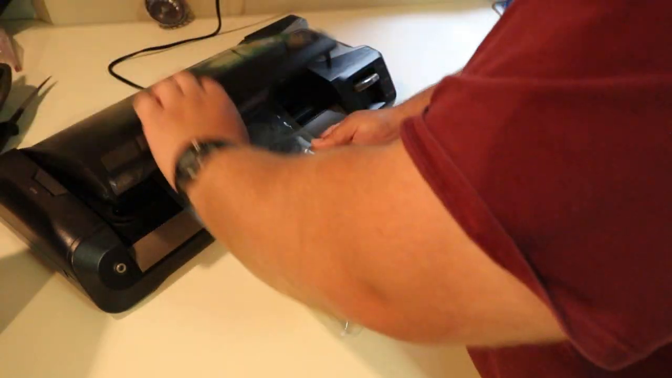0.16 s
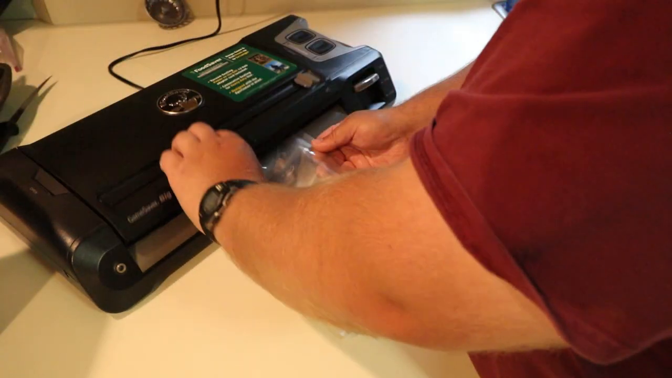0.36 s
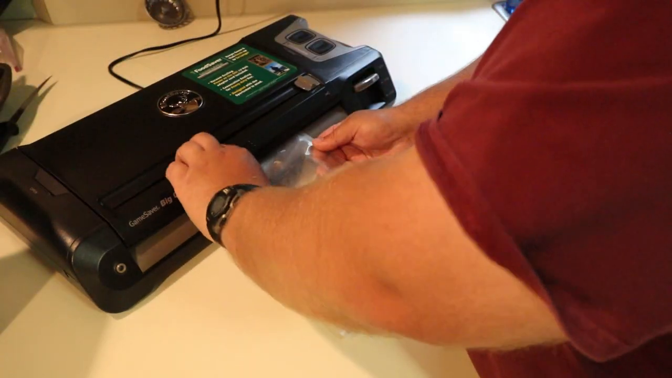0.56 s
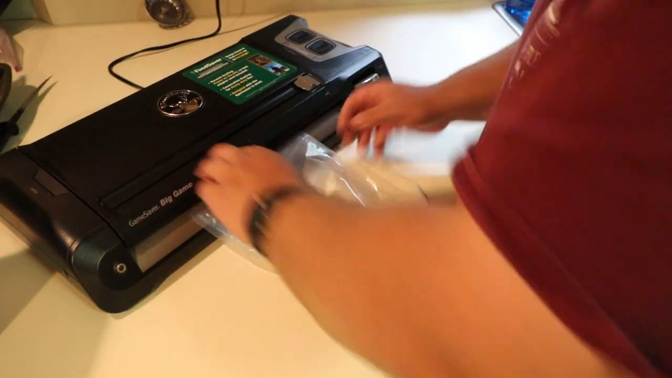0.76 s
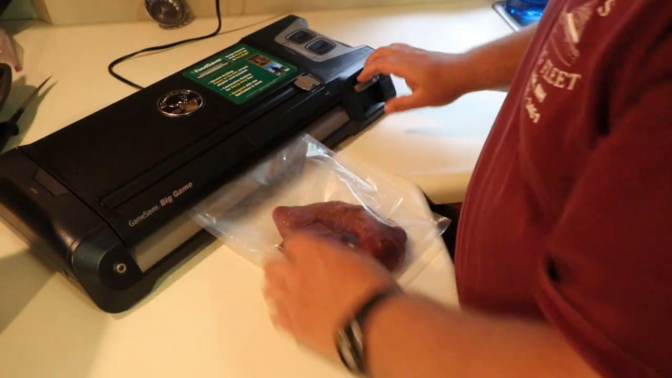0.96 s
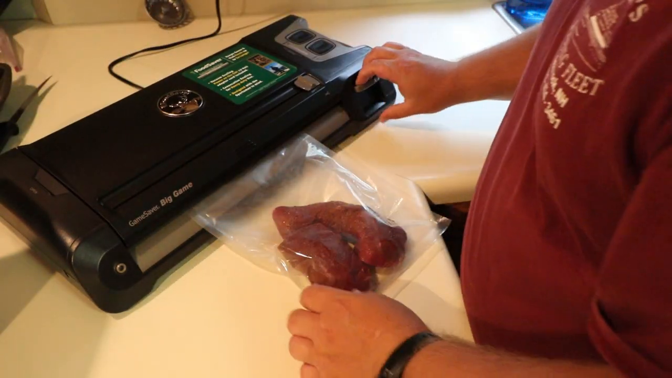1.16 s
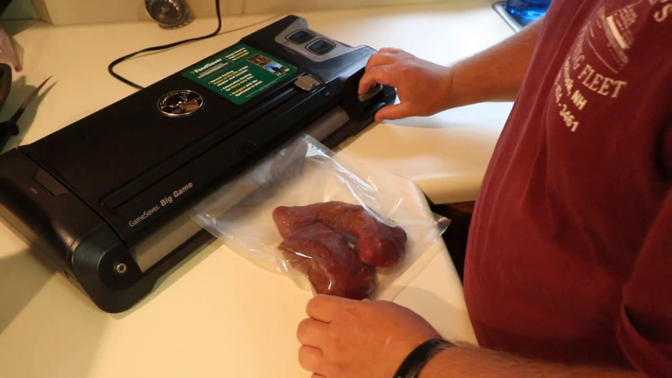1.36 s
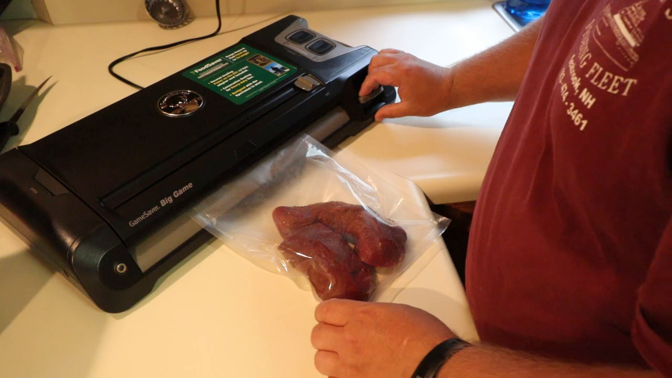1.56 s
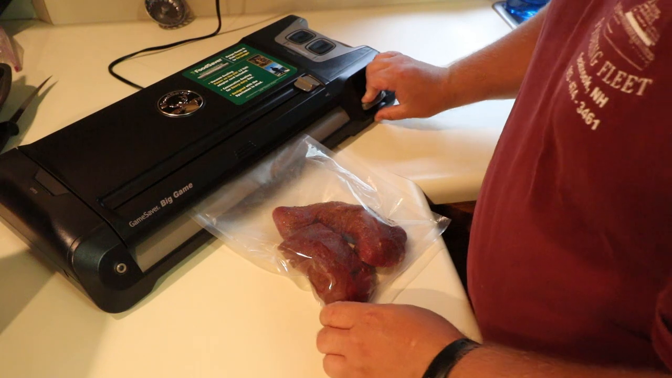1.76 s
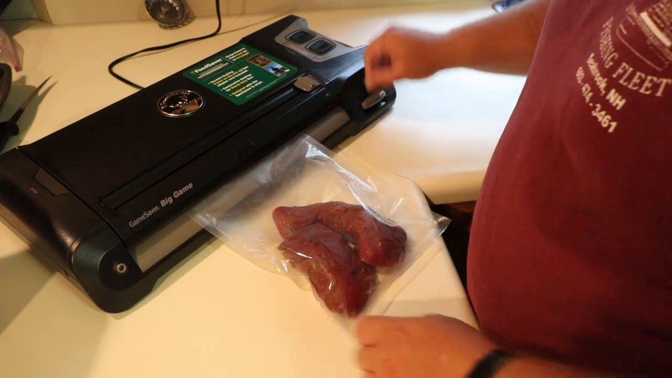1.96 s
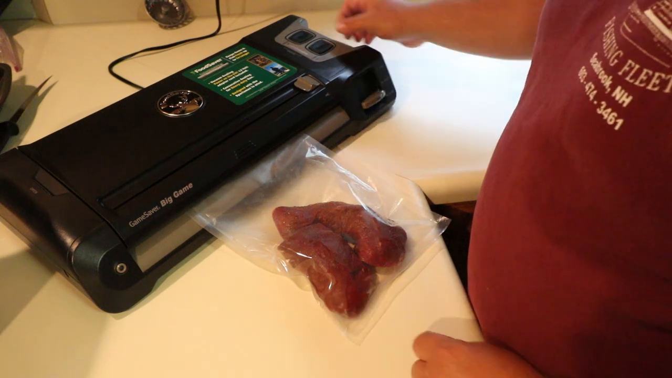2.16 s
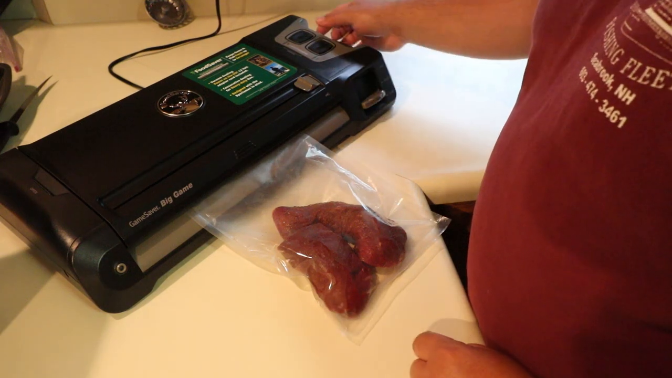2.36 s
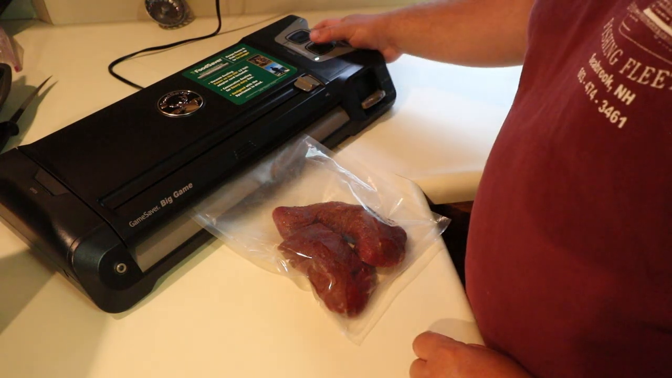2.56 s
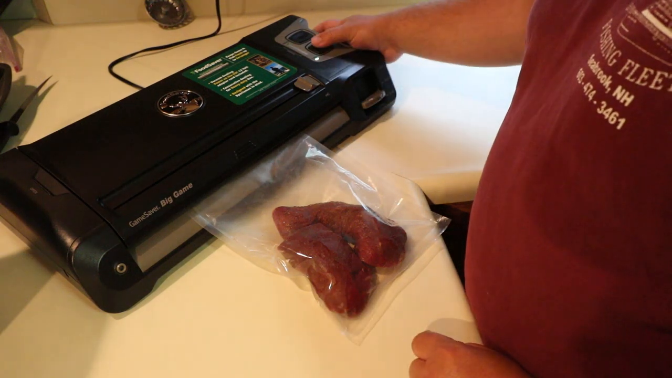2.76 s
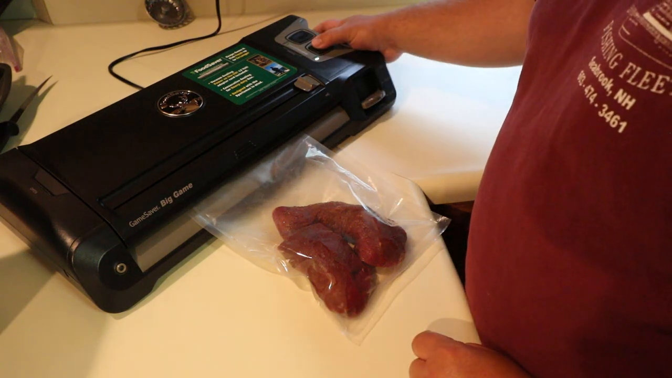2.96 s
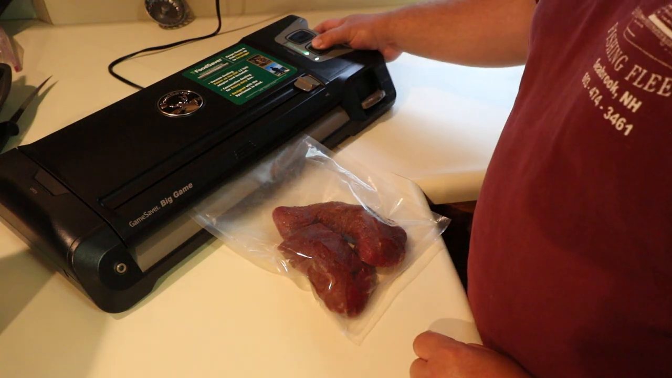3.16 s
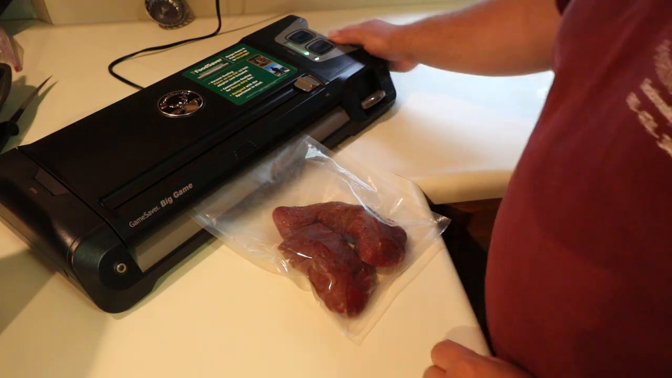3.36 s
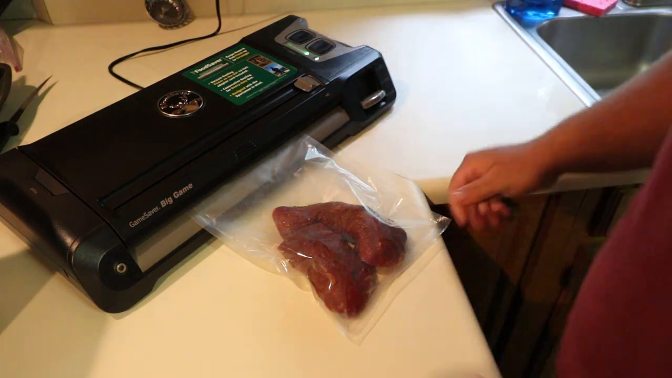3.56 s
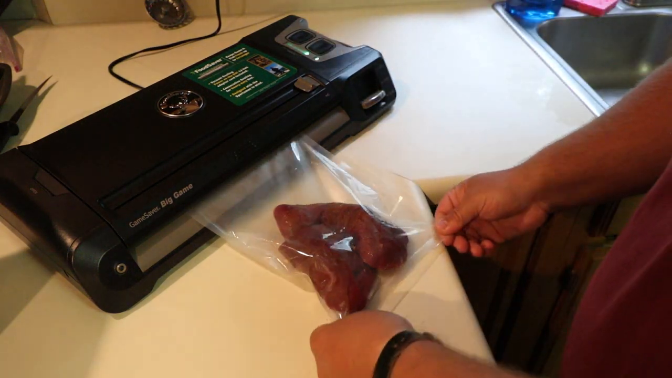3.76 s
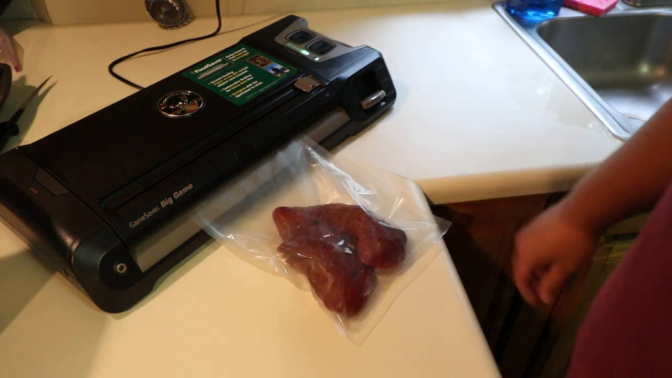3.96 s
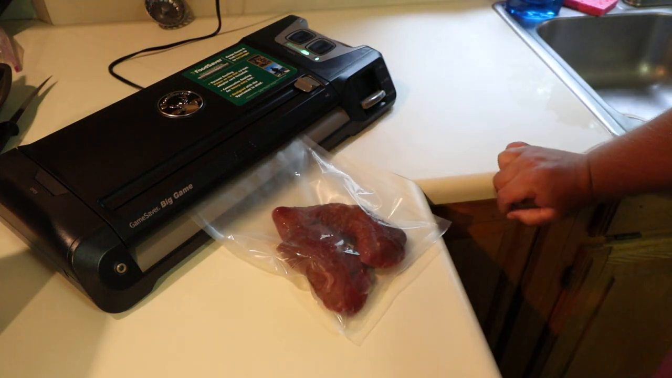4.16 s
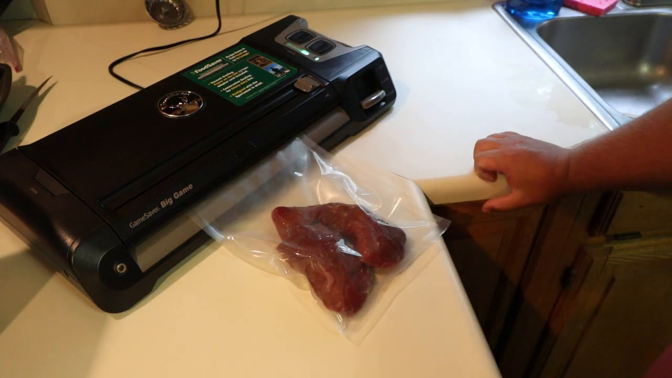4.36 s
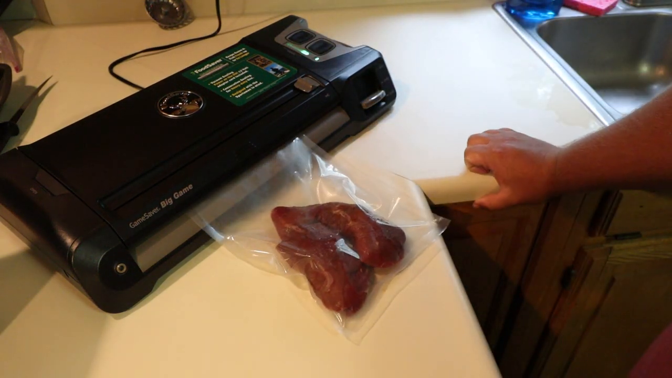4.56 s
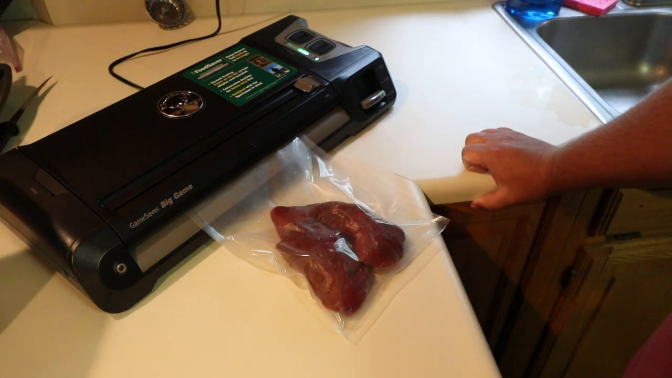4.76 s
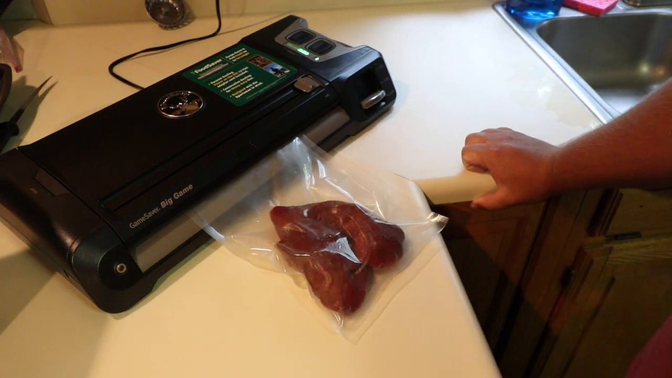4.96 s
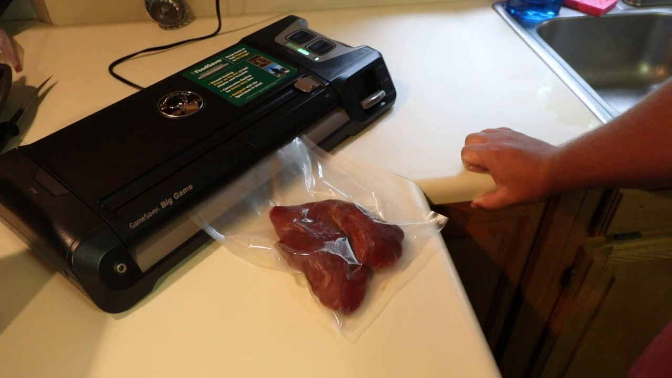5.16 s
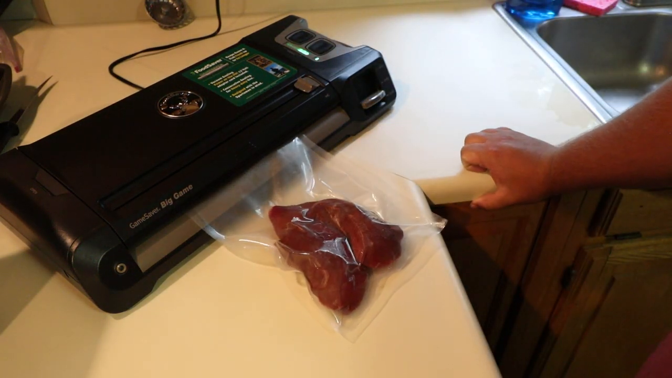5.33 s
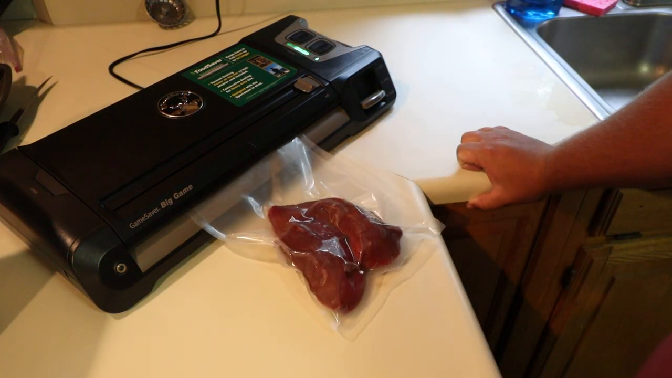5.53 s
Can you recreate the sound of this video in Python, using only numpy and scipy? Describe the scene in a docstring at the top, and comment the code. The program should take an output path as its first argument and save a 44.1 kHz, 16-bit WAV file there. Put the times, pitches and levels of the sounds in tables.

```python
"""First, faint plastic knocks and the brush of sleeves: a kitchen vacuum sealer on a worktop, one microphone.
The lid is lowered onto a plastic bag, the latch is forced home with two loud clacks, and a finger works
the panel and presses start. A piston pump then buzzes at about 113 strokes a second, built stroke by
stroke from housing knock, reed valves, linkage ticks and puffs of air; its valve timing moves as the air
is drawn out. Plastic parts are noise bursts, grains and ringing modes; hard walls answer most of it."""
import sys
import numpy as np
from scipy import signal
from scipy.fft import rfft, irfft
from scipy.io import wavfile
from scipy.ndimage import uniform_filter1d

SR = 44100
rng = np.random.default_rng(int(sys.argv[2]) if len(sys.argv) > 2 else 0)


def waveform_to_disk(signal):
    """Save audio, clipped to [-1, 1], as 16-bit WAV at the path in sys.argv[1]."""
    frames = np.transpose(np.atleast_2d(signal))
    scaled = np.clip(frames, -1, 1) * 32767
    samples = np.round(scaled).astype(np.int16)
    wavfile.write(sys.argv[1], SR, samples)


N = 251149
TIME = np.arange(N) / SR


def undb(db):
    """Decibels to gain."""
    return 10 ** (np.asarray(db) / 20)


def unit(x):
    """Scale to rms 1."""
    return x / np.sqrt(np.mean(x ** 2) + 1e-30)


def curve(rows, axis=1):
    """One column of a timed table at every sample."""
    rows = np.asarray(rows)
    return np.interp(TIME, rows[:, 0], rows[:, axis])


def ramp(start_s, length_s):
    """Rise from 0 to 1, then stay."""
    return np.clip((TIME - start_s) / max(length_s, 1e-4), 0, 1)


def fade(t60):
    """One second of exponential decay, down 60 dB after t60 seconds."""
    return np.exp(-np.log(1000) * TIME[:SR] / max(t60, 1e-3))


def through(x, response):
    """Pass a sound through an impulse response."""
    return signal.fftconvolve(x, response)[:len(x)]


def colour(points, size=4096):
    """Minimum-phase impulse response of an (f/Hz, level/dB) spectrum, by folding its cepstrum."""
    hz, db = np.transpose(points)
    bins = np.maximum(np.fft.rfftfreq(size, 1 / SR), 1)
    log_gain = np.log(undb(np.interp(np.log(bins), np.log(hz), db)))
    cepstrum = irfft(log_gain)
    cepstrum[1:size // 2] *= 2
    cepstrum[size // 2 + 1:] = 0
    return irfft(np.exp(rfft(cepstrum)))


def band(x, hz, kind, order=3):
    """Butterworth filter."""
    return signal.sosfilt(signal.butter(order, hz, kind, fs=SR, output="sos"), x)


def ring(modes):
    """Impulse response of (f/Hz, level/dB, t60/s) modes: a sum of decaying sines."""
    return sum(undb(db) * fade(t60) * np.sin(2 * np.pi * hz * TIME[:SR]) for hz, db, t60 in modes)


def add(out, s, sound):
    """Mix a sound in at a time."""
    i = max(int(s * SR), 0)
    out[i:i + len(sound)] += sound[:N - i]


def strike(x, db, size=256):
    """Set the rms level of the loudest few milliseconds."""
    return x * undb(db) / np.sqrt(uniform_filter1d(x ** 2, size).max())


def clicks(times, sizes, size=8):
    """Band-limited impulses at times that may fall between samples."""
    out = np.zeros(N + SR)
    places = (times * SR).astype(int)[:, None] + np.arange(1 - size, size + 1)
    offset = places - times[:, None] * SR
    window = np.cos(np.pi * offset / (2 * size)) ** 2
    np.add.at(out, places, sizes[:, None] * np.sinc(offset) * window)
    return out[:N]


def grains(per_s, spread_db):
    """Dense random micro-slips of uneven size, at rms 1."""
    slips = (rng.random(N) < per_s / SR) * rng.choice([-1, 1], N)
    sizes = undb(spread_db * np.minimum(rng.exponential(size=N), np.pi))
    return unit(slips * sizes)


def gestures(rows, attack_s, release_s, swell_db):
    """Envelope of (start, length, level) movements: each sets in, swells to its level and dies away."""
    out = 0
    for s, length, db in rows:
        swell = undb(db + swell_db * (ramp(s, length) - 1))
        release = np.exp(-np.maximum(TIME - s - length, 0) / release_s)
        out = out + swell * ramp(s, attack_s) * release
    return out


PUMP_START_S = 3.2595
RUNNING = TIME >= PUMP_START_S
# speed of the pump: (t/s, strokes per second f/Hz)
SPEED = [(3.27, 115.4), (3.31, 116.0), (3.79, 114.3), (4.02, 114.2), (4.26, 113.5), (4.91, 112.8),
         (5.68, 113.3)]


def motor():
    """Add up the speed into turns since the start, and find the time of each stroke."""
    turns = np.cumsum(curve(SPEED) * RUNNING) / SR
    strokes = np.interp(np.arange(int(turns[-1]) + 1) + 1e-6, turns, TIME)
    return turns, strokes


def beats(strokes, lag_s, looseness, jitter_s=.000005, scatter_db=0.5):
    """One time and size a stroke, both slightly uneven in proportion to the looseness."""
    chance = rng.standard_normal((len(strokes), 2)).T * looseness
    return strokes + lag_s + jitter_s * chance[0], undb(scatter_db * chance[1])


def heard(x, room, room_db):
    """Direct sound and room, at rms 1 while the motor runs."""
    return unit(x + undb(room_db) * through(x, room)) * np.sqrt(RUNNING.mean())


# spectral peaks of the housing knock, stepped evenly in frequency: (multiple of KNOCK_STEP_HZ, level/dB)
KNOCK = [(1, 0.5), (2, -4.5), (3, 9), (4, 10), (5, -17.5), (6, 0), (7, 5), (8, 10.5), (9, 11), (10, 10.5),
         (11, 0.5), (12, 16.5), (13, 7.5), (14, -7.5), (15, 17.5), (16, -1), (17, -8.5), (18, -1)]
# the same peaks while the pump still runs light, before a common lift: (multiple of KNOCK_STEP_HZ, level/dB)
LIGHT_KNOCK = [(1, -6.5), (2, -22.5), (3, 4), (4, -11.5), (5, -7.5), (6, -2), (7, -17.5), (8, 6), (9, -5.5),
               (10, 3), (11, -1.5), (12, 0.5), (13, -20), (14, 2), (15, -7), (16, -10), (17, -7), (18, 3.5)]
KNOCK_STEP_HZ, LIGHT_LIFT_DB = 108.7, 9.5
# the knock hardens as the bag collapses
COLLAPSE_START_S, COLLAPSE_S = 3.61, 0.82


def housing_knock(strokes, room, wet_db=-21):
    """Each piston blow excites the housing; its colour crossfades from light running to hard."""
    blows = clicks(*beats(strokes, 0, 0.32))

    def housing(orders, db=0):
        """The blows of the piston as the housing colours them."""
        peaks = [(k * KNOCK_STEP_HZ, level + db) for k, level in orders]
        body = [(45, -32)] + peaks + [(2600, -6.5), (4200, -35), (9000, -31)]
        return -heard(band(through(blows, colour(body)), 67, "highpass"), room, wet_db)

    collapsed = ramp(COLLAPSE_START_S, COLLAPSE_S)
    return (1 - collapsed) * housing(LIGHT_KNOCK, LIGHT_LIFT_DB) + collapsed * housing(KNOCK)


def slaps(modes, times, sizes, pitch_hz, size=1024):
    """A reed rings briefly at each of its slaps."""
    out = np.zeros(N + SR)
    places = (times * SR).astype(int)[:, None] + np.arange(1, size + 1)
    age = places / SR - times[:, None]
    rings = 0
    for ratio, db, t60 in modes:
        tone = np.sin(2 * np.pi * ratio * pitch_hz[:, None] * age)
        rings = rings + undb(db) * np.exp(-np.log(1000) * age / t60) * tone
    np.add.at(out, places, sizes[:, None] * rings)
    return out[:N]


# the intake valve slaps earlier as the vacuum builds: (t/s, delay after the stroke t/s)
INTAKE_LAG = [(3.26, 0.004), (3.9, 0.0038), (4.4, .0024), (5.69, 0.0018)]
EXHAUST_LAG_S = 0.001021


def intake_delay(strokes):
    """Delay of the intake slap at each stroke."""
    return np.interp(strokes, TIME, curve(INTAKE_LAG))


# pitch of the reeds, shifting with the load: (t/s, intake f/Hz, exhaust f/Hz)
REEDS = [(3.28, 2358, 3530), (3.44, 2445, 3410), (3.6, 2410, 3375), (3.8, 2583, 3264), (4.25, 2540, 3458),
         (4.78, 2525, 3340), (5.68, 2486, 3450)]
# resonances of the two valves: (ratio to the reed's pitch, level/dB, t60/s)
INTAKE = [(.83, 2, 0.018), (.95, 0.5, 0.047), (1.03, 11, 0.015)]
EXHAUST = [(.97, 8.5, 0.018), (1.06, -3, 0.035), (1.24, -14, 0.04)]


def reed_valves(strokes, room, wet_db=-15):
    """Intake and exhaust reeds slap once a stroke, each at its own delay and moving pitch."""
    intake_hz = np.interp(strokes, TIME, curve(REEDS))
    exhaust_hz = np.interp(strokes, TIME, curve(REEDS, axis=2))
    # the intake reed flutters while plenty of air still flows
    flutter = np.interp(strokes, [4.1, 4.5], [3.5, 1.6])
    intake = slaps(INTAKE, *beats(strokes, intake_delay(strokes), flutter), intake_hz)
    exhaust = slaps(EXHAUST, *beats(strokes, EXHAUST_LAG_S, 0.85), exhaust_hz)
    return (heard(band(intake, 1840, "highpass"), room, wet_db),
            heard(band(exhaust, 2770, "highpass"), room, wet_db))


# metallic tick of the linkage: (f/Hz, level/dB)
TICK = [(3600, -8), (4200, -4), (4800, -8), (5300, -3), (6300, -8), (7300, -3), (7850, -2.5), (8300, -10),
        (8850, -4.5), (9500, -15), (10300, -12), (11300, -19), (14400, -27), (16000, -46)]
# the metal of the linkage spreads each tick, treble first
TICK_SPREAD_S = .0025


def linkage_ticks(strokes, room, wet_db=-12):
    """The linkage ticks at the turn of the stroke and again as each valve seats."""
    ticks = clicks(*beats(strokes, 0, 0.65))
    ticks += 0.5 * clicks(*beats(strokes, EXHAUST_LAG_S, 0.89))
    ticks += 0.5 * clicks(*beats(strokes, intake_delay(strokes), 1.0))
    spread = signal.chirp(TIME[TIME < TICK_SPREAD_S], SR / 2, TICK_SPREAD_S, 0)
    metal = through(through(ticks, spread), colour(TICK))
    return heard(band(metal, 5150, "highpass"), room, wet_db)


# air rushing through the ports: (f/Hz, level/dB)
AIR = [(40, -25), (200, -18), (600, -10.5), (1500, 2), (2600, 4), (2900, -24), (3400, 4), (4300, -4),
       (6300, 0.5), (7700, 6.5), (10000, -10.5), (16000, -21)]


def port_air(turns, room, wet_db=-12):
    """Noise puffs through the ports, strongest at each stroke and dying over the turn."""
    puff = (0.051 + np.exp(-(turns % 1) / 0.35)) * RUNNING
    return heard(through(puff * rng.standard_normal(N), colour(AIR)), room, wet_db)


# the pump's load: air rushes while the bag empties, then the strain grows as the vacuum hardens
FLOW_START_S, FLOW_RISE_S, FLOW_END_S, FLOW_FALL_S, STRAIN_START_S = 3.37, 0.058, 4.205, 0.24, 4.92


def loaded(level):
    """Gain of a pump part, following airflow and strain."""
    db, flow_db, strain_db_per_s = level
    flow = ramp(FLOW_START_S, FLOW_RISE_S) - ramp(FLOW_END_S - FLOW_FALL_S, FLOW_FALL_S)
    return undb(db + flow_db * flow + strain_db_per_s * np.maximum(TIME - STRAIN_START_S, 0))


# pump parts: (level/dB, change at full airflow dB, growth under strain dB per s)
KNOCK_LEVEL, INTAKE_LEVEL = (-35.5, -1.2, 0.99), (-40, 6, 9.2)
EXHAUST_LEVEL, TICK_LEVEL = (-36.5, -0.33, 2), (-40.5, -0.22, 1.1)
AIR_DB = -48
# exhaust valve and linkage start softly and come up to strength (time constant, starting offsets)
RUN_IN_S, EXHAUST_RUN_IN_DB, TICK_RUN_IN_DB = 0.092, -5, -9.5
FIRST_SLAP_DB = 7  # the first stroke slaps the intake valve hardest


def pump(room):
    """Each stroke knocks the housing, two reed valves slap, the linkage ticks and air puffs through."""
    turns, strokes = motor()
    intake, exhaust = reed_valves(strokes, room)
    cold = np.exp(-np.maximum(TIME - PUMP_START_S, 0) / RUN_IN_S)
    out = housing_knock(strokes, room) * loaded(KNOCK_LEVEL)
    out += intake * loaded(INTAKE_LEVEL) * undb(FIRST_SLAP_DB * np.clip(2 - turns, 0, 1))
    out += exhaust * loaded(EXHAUST_LEVEL) * undb(EXHAUST_RUN_IN_DB * cold)
    out += linkage_ticks(strokes, room) * loaded(TICK_LEVEL) * undb(TICK_RUN_IN_DB * cold)
    out += port_air(turns, room) * undb(AIR_DB)
    # the motor takes up its slack with a jolt
    jolt = through(rng.standard_normal(SR) * fade(0.13), colour(CRACK))
    add(out, 3.252, strike(jolt, -34))
    return out


# knocks and clicks of lid, latch and switch, before the band trims below:
# (t/s, middle level/dB, low body level/dB, treble level/dB, main resonance f/Hz)
CLACKS = [(0.014, -43.5, -61, -62, 1300), (0.047, -39.5, -60, -64, 1315), (0.179, -48, -61, -60, 990),
          (0.211, -31, -52, -38, 1130), (0.356, -43, -49, -73, 681), (0.415, -41, -50, -47, 1200),
          (0.433, -36.5, -43.5, -44.5, 534), (0.46, -27, -48, -47, 640), (0.469, -29, -31.5, -42.5, 2110),
          (0.482, -25, -30, -66, 790), (0.643, -41, -50, -62, 1110), (0.663, -50.5, -70, -60, 736),
          (0.788, -44.5, -52, -55, 1140), (1.022, -35.5, -52.5, -46.5, 575), (1.074, -44, -54, -42, 1798),
          (1.133, -44, -52.5, -43, 556), (1.356, -10.5, -23, -15.5, 847), (1.363, -17, -25.5, -30, 520),
          (1.573, -35.5, -48, -53, 789), (1.646, -44, -50, -62, 434.5), (1.681, -38.5, -52.5, -57, 800),
          (1.709, -3, -22, -13.5, 684), (1.717, -9.5, -27, -26.5, 900), (1.936, -18, -30, -32, 1053),
          (1.943, -16, -28.5, -42, 705), (2.134, -49, -74, -50.5, 800), (3.208, -25.5, -44, -40.5, 540)]
# modes of the plastic case: (f/Hz, level/dB, t60/s)
CASE = [(340, -17, .12), (450, -8, 0.19), (715, 2.5, .06), (779, -1.5, .08), (832, 0, 0.076),
        (1063, -2, 0.045), (1190, 1.5, 0.16), (1430, -5, 0.046), (1774, -5, .05), (2422, -7, .025)]
# crack of hard plastic, also colouring the jolt and the scrape: (f/Hz, level/dB)
CRACK = [(100, -12), (250, -5), (400, 2.5), (750, 6), (1200, 4.5), (2000, 0.5), (2900, -3), (4000, -4),
         (4800, -14), (7500, -18), (11000, -26.5), (16000, -32)]
CLACK_T60_S = 0.049


def clacks(case_share=0.36, tone_share=0.75, body_ring=1.9, treble_ring=0.58, mid_db=-4, treble_db=-1,
           wet_db=-7):
    """Plastic meets plastic: short crack, case modes and slower hollow body, each with its own echo."""
    out, case, crack = np.zeros(N), strike(ring(CASE), 0), colour(CRACK)
    for s, db, body_db, edge_db, hz in CLACKS:
        noise, tail = rng.standard_normal(SR), undb(wet_db) * kitchen()

        def burst(decay_s):
            """A crack of unit energy running into the room."""
            direct = noise * fade(decay_s)
            return through(direct / np.sqrt(np.sum(direct ** 2)) + tail, crack)

        middle = strike(band(burst(CLACK_T60_S), [500, 2500], "bandpass"), 0)
        tone = strike(ring([(hz, 0, CLACK_T60_S)]), 0)
        middle = middle + case_share * case + tone_share * tone
        body = band(burst(CLACK_T60_S * body_ring), [110, 500], "bandpass")
        edge = band(burst(CLACK_T60_S * treble_ring), 2500, "highpass")
        add(out, s, strike(middle, db + mid_db) + strike(body, body_db) + strike(edge, edge_db + treble_db))
    return out


# plastic sliding on plastic, harder and harder until it slips free: (start t/s, length t/s, end level/dB)
SLIDES = [(.41, 0.051, -54), (.765, 0.031, -51.5), (1.022, 0.062, -48), (1.1, .04, -52),
          (1.2, 0.031, -59.5), (1.338, 0.01, -31.5), (1.352, 0.0069, -14), (1.695, .012, -27.5),
          (1.709, 0.0084, -14.5), (2.133, 0.044, -52.5), (2.192, .012, -52.5)]
SLIDE_ATTACK_S, SLIDE_RELEASE_S, SLIDE_SWELL_DB = 0.0046, .003, 4.5


def scrape():
    """Lid and latch grate over their catches: dense micro-slips coloured as hard plastic."""
    grating = unit(band(through(grains(6000, 3.5), colour(CRACK)), 320, "highpass"))
    return grating * gestures(SLIDES, SLIDE_ATTACK_S, SLIDE_RELEASE_S, SLIDE_SWELL_DB)


# strokes of a finger on the control panel: (start t/s, length t/s, level/dB)
RUBS = [(2.277, 0.0056, -30), (2.308, 0.0064, -39.5), (2.358, 0.032, -32), (2.41, 0.055, -45.5),
        (2.52, .04, -55), (2.56, .055, -47), (2.67, 0.052, -62.5)]
RUB_ATTACK_S, RUB_RELEASE_S, RUB_SWELL_DB = 0.0061, 0.01, 2
# modes of the panel: (f/Hz, level/dB, t60/s)
PANEL = [(694, -8, 0.043), (870, -5.5, 0.0056), (1170, -8.5, 0.019), (1986, -12, 0.0088),
         (3730, -12.5, 0.02)]
SQUEAK_HZ = 715


def panel(waver_hz=30):
    """A fingertip sticks and slips in a wavering squeak; grit rings the modes under a thin scrape."""
    waver = unit(band(rng.standard_normal(N), 76.3, "lowpass"))
    squeak = np.sin(2 * np.pi * np.cumsum(SQUEAK_HZ + waver_hz * waver) / SR)
    slips = grains(2500, 2.8)
    grit = undb(-4.5) * unit(through(slips, ring(PANEL)))
    thin_scrape = undb(-23) * unit(through(slips, colour(FILM)))
    return (squeak + grit + thin_scrape) * gestures(RUBS, RUB_ATTACK_S, RUB_RELEASE_S, RUB_SWELL_DB)


# hands shifting the bag: (start t/s, length t/s, level/dB)
CRINKLES = [(.21, .12, -76), (.43, .055, -83), (.75, .042, -70), (1.03, .05, -57.5), (1.125, .012, -57)]
CRINKLE_ATTACK_S, CRINKLE_RELEASE_S, CRINKLE_SWELL_DB = .006, .012, 8.5
# creases snapping as the bag tightens: (t/s, level/dB)
CREASES = [(3.857, -39), (3.921, -45), (3.9361, -27.5), (5.2394, -37), (5.297, -38), (5.4035, -38)]
# bright colour of thin film, also of the finger's scrape: (f/Hz, level/dB)
FILM = [(300, -17.5), (1500, -11), (4000, -5), (9500, 2), (12000, -5.5), (16000, -7.5)]


def bag():
    """The film crinkles under the hands, and single creases snap under suction."""
    film = colour(FILM)
    crinkle = unit(through(grains(1400, 4.2), film))
    out = crinkle * gestures(CRINKLES, CRINKLE_ATTACK_S, CRINKLE_RELEASE_S, CRINKLE_SWELL_DB)
    for s, db in CREASES:
        add(out, s, strike(through(rng.standard_normal(SR) * fade(0.032), film), db))
    return out


# blows that reach the worktop: (t/s, level/dB)
THUMPS = [(.245, -51.5), (.485, -30), (0.574, -51), (1.036, -41.5), (1.36, -30), (1.574, -50.5),
          (1.712, -33.5), (1.942, -43)]
# modes of the worktop: (f/Hz, level/dB, t60/s)
WORKTOP = [(33, -20, .5), (44, -2, 0.3), (62.46, -3.5, .2), (73, 1.5, 0.32), (150, -11, .1)]
# hollow modes of the lid as it lands: (f/Hz, level/dB, t60/s)
LID = [(156.2, 2, 0.24), (220, -5, 0.24), (272, -5, 0.23), (334, -18, .1)]


def worktop(lid_s=.473, lid_db=-34):
    """The heavier blows set the worktop booming, and the lid lands with a hollow note."""
    out, boom = np.zeros(N), band(ring(WORKTOP), [35, 220], "bandpass")
    for s, db in THUMPS:
        add(out, s, strike(boom, db))
    add(out, lid_s, strike(ring(LID), lid_db))
    return out


# arms and clothes moving over the worktop: (start t/s, length t/s, level/dB)
MOVES = [(0, 0.052, -51), (.34, 0.12, -50.5), (.72, 0.079, -60.5), (1.3, 0.78, -57)]
MOVE_ATTACK_S, MOVE_RELEASE_S, MOVE_SWELL_DB = 0.004, 0.026, 2
# dull colour of cloth: (f/Hz, level/dB)
SLEEVE = [(25, 15), (80, 2), (300, 6), (900, -1), (1500, -4), (3500, -9), (5000, -21.5), (16000, -38)]
# the clothes rustle faintly until the body comes to rest, then die away (time constant)
RUSTLE_DB, REST_S, SETTLE_S = -64, 2.62, 0.22


def clothes():
    """Sleeves brush the worktop with each move, over a faint rustle."""
    rustle = undb(RUSTLE_DB) * np.exp(-np.maximum(TIME - REST_S, 0) / SETTLE_S)
    moves = gestures(MOVES, MOVE_ATTACK_S, MOVE_RELEASE_S, MOVE_SWELL_DB)
    return unit(through(grains(3300, 3.5), colour(SLEEVE))) * np.hypot(rustle, moves)


# reverberation between hard kitchen walls: (f/Hz, t60/s, level/dB)
KITCHEN = [(100, .6, -1), (400, 0.34, -2), (1000, 0.27, 1.5), (3000, 0.29, -3), (6900, 0.34, -0.5),
           (14000, 0.19, 5.5)]


def kitchen(build_s=0.0028):
    """Diffuse tail of unit energy: noise in overlapping bands, each with its own decay."""
    hz, t60, db = np.transpose(KITCHEN)
    noise = rfft(rng.standard_normal(SR))
    log_hz = np.log(np.maximum(np.arange(len(noise)), 1))
    shares = [np.interp(log_hz, np.log(hz), row) for row in np.eye(len(hz))]
    tail = sum(irfft(noise * share, SR) * fade(t) * undb(d) for share, t, d in zip(shares, t60, db))
    tail = tail * (1 - np.exp(-(TIME[:SR] / build_s) ** 2))
    return tail / np.sqrt(np.sum(tail ** 2))


# colour of the quiet kitchen: (f/Hz, level/dB)
QUIET = [(25, -11), (70, -9), (110, -10.5), (300, -13), (700, -15), (1300, -24.5), (4000, -32), (5000, -33),
         (16000, -49.5)]
QUIET_DB = -72  # overall rms


def quiet_kitchen():
    """Steady background noise, heaviest in the bass."""
    return unit(through(rng.standard_normal(N), colour(QUIET))) * undb(QUIET_DB)


def scene():
    """Handling, then the pump, in a quiet kitchen."""
    room = kitchen()
    handling = scrape() + panel() + bag()
    handling = handling + undb(-16) * through(handling, room)
    return (pump(room) + clacks() + handling + worktop() + clothes() + quiet_kitchen())[None]


TOP_HZ = 16000


def record(dry):
    """The recorder clips at full scale and cuts the top."""
    low_pass = signal.ellip(8, .2, 70, TOP_HZ, fs=SR, output="sos")
    return signal.sosfilt(low_pass, np.clip(dry, -1, 1))


dry = scene()
out = record(dry)
waveform_to_disk(out)
```